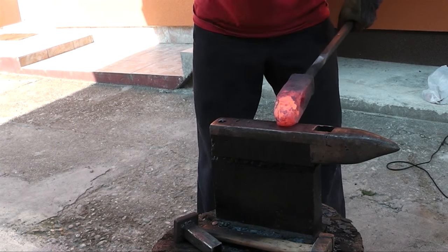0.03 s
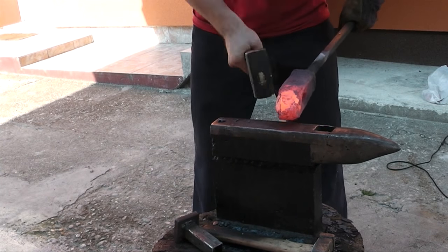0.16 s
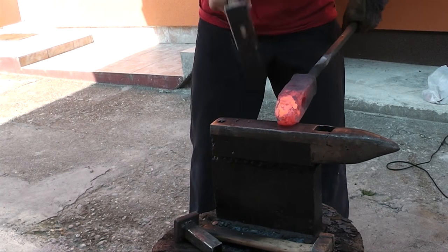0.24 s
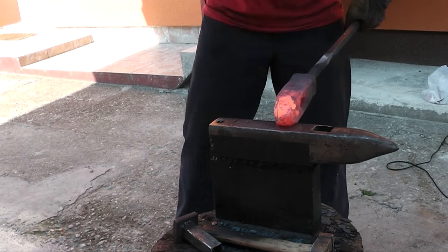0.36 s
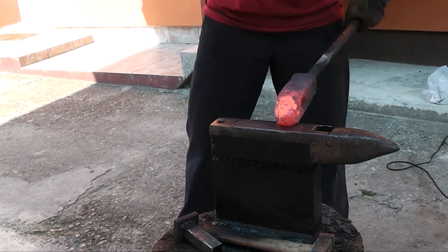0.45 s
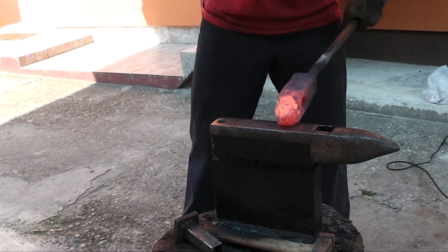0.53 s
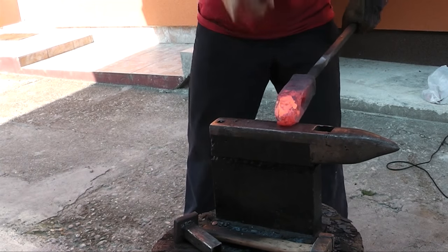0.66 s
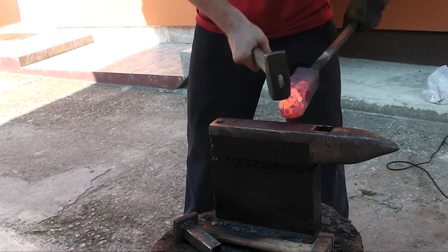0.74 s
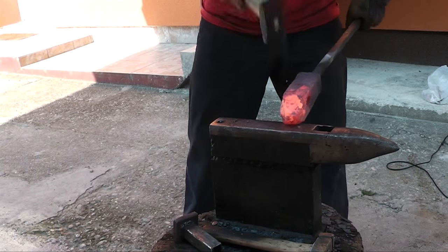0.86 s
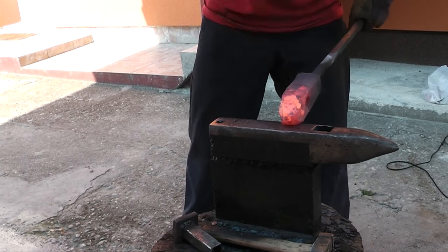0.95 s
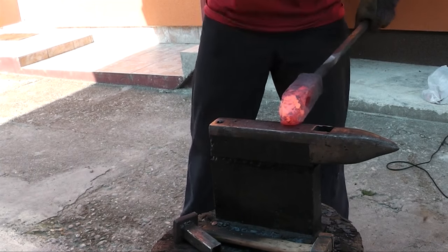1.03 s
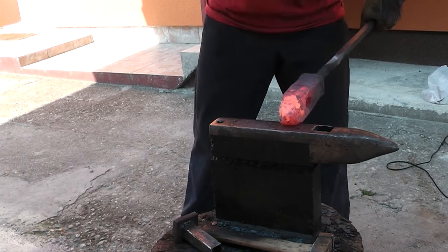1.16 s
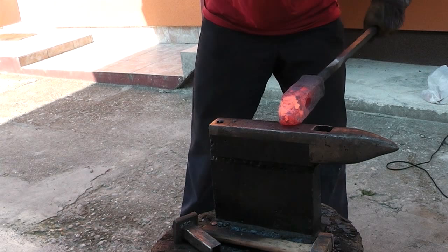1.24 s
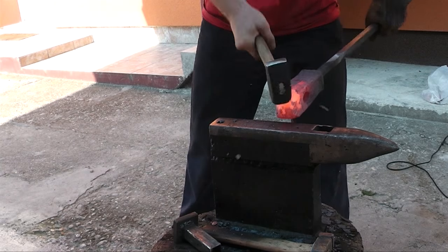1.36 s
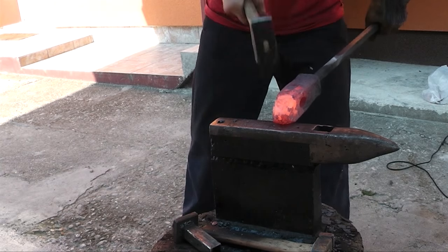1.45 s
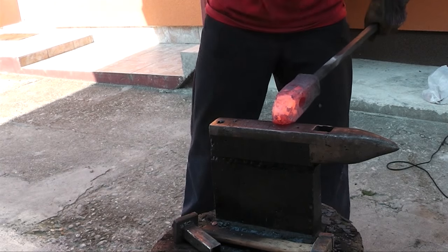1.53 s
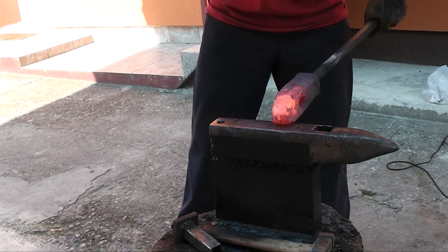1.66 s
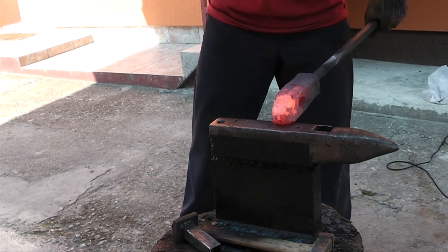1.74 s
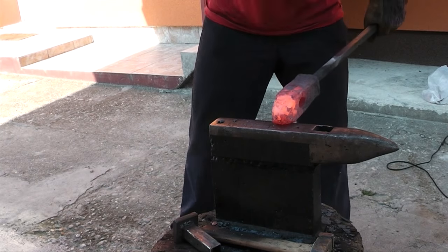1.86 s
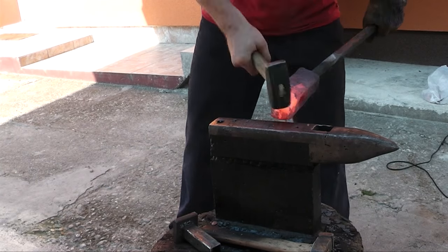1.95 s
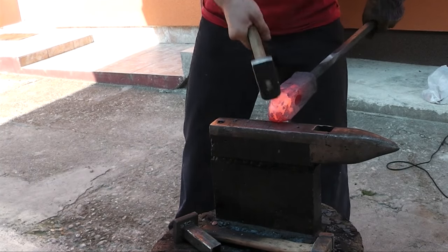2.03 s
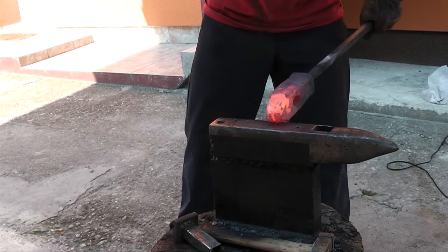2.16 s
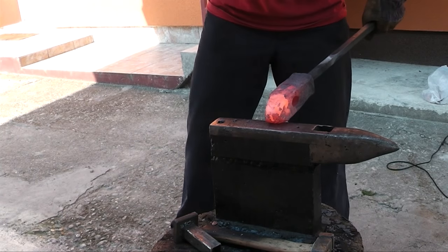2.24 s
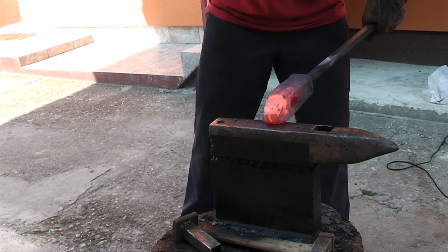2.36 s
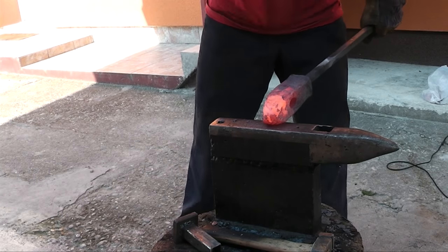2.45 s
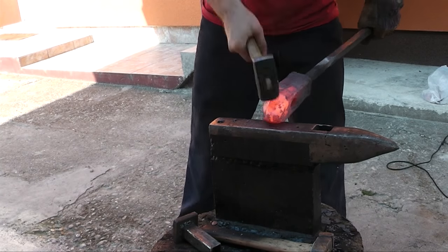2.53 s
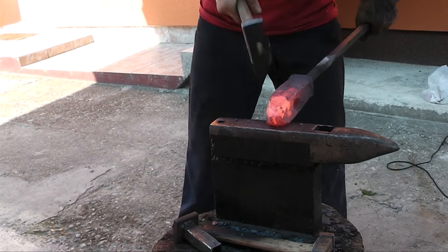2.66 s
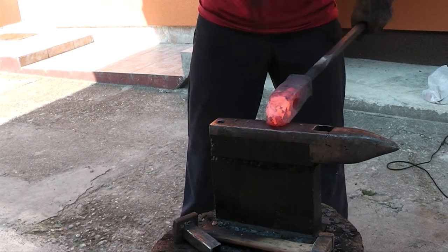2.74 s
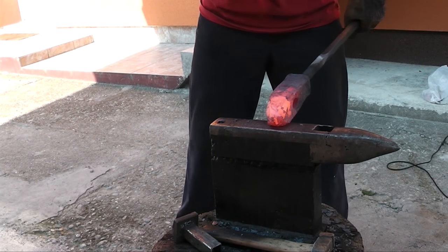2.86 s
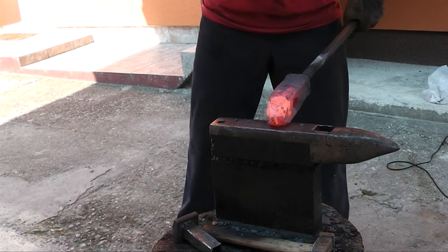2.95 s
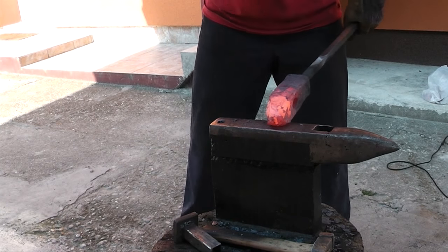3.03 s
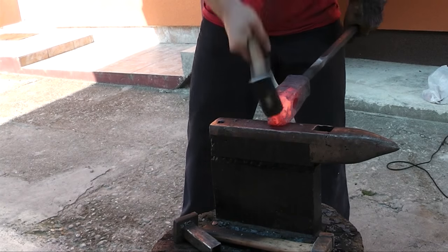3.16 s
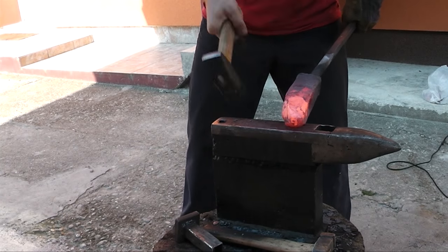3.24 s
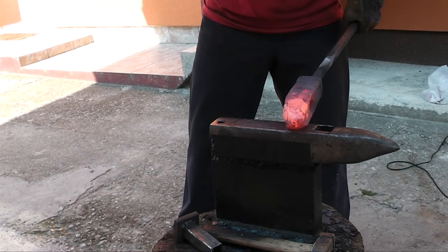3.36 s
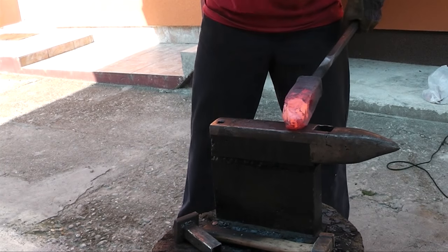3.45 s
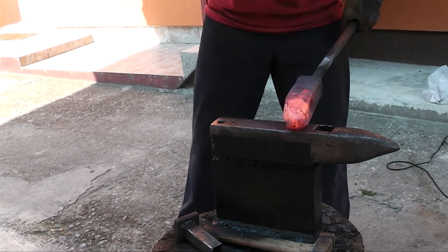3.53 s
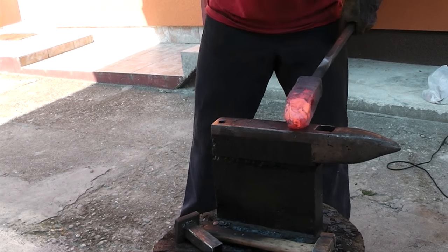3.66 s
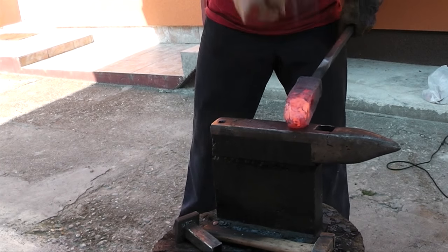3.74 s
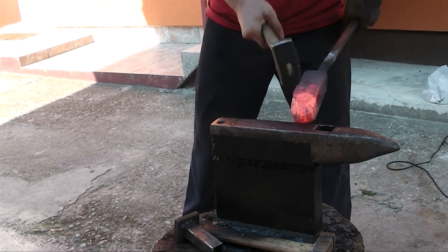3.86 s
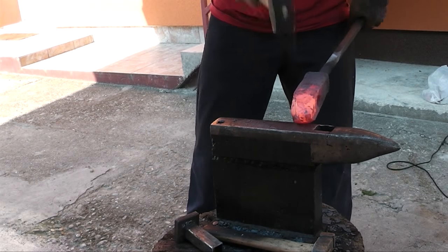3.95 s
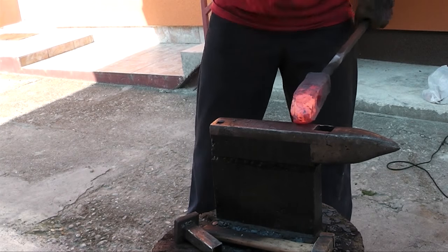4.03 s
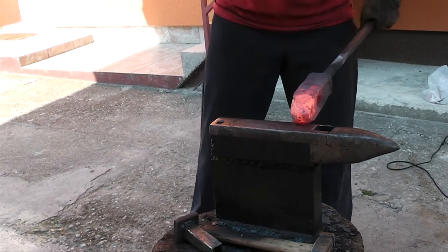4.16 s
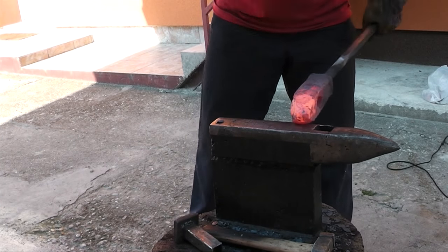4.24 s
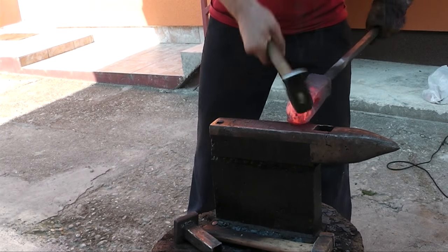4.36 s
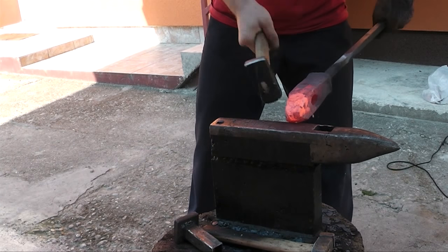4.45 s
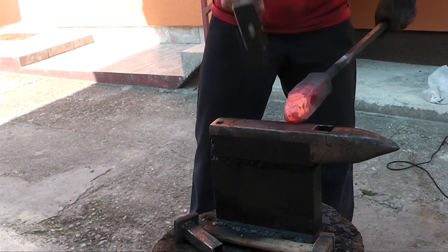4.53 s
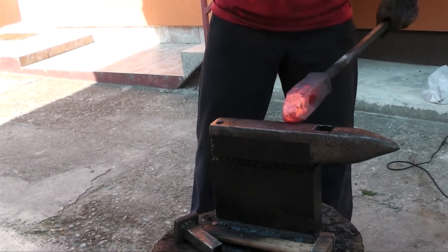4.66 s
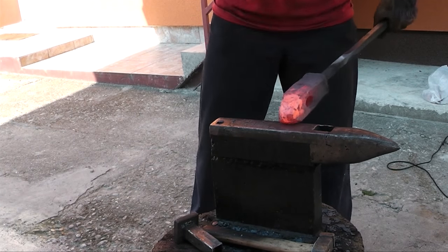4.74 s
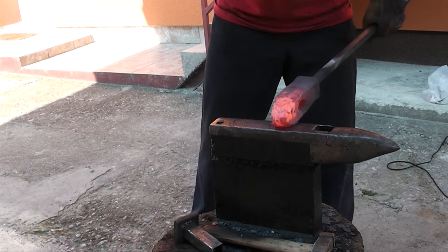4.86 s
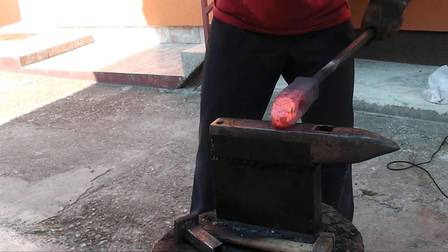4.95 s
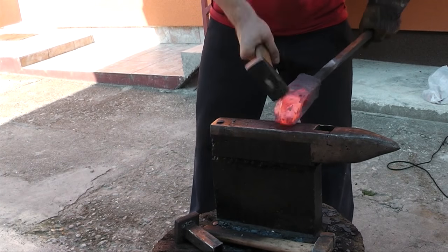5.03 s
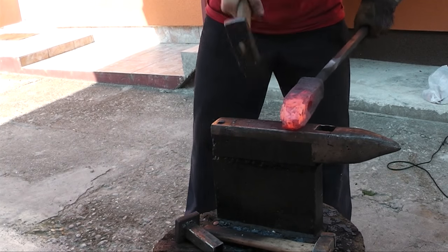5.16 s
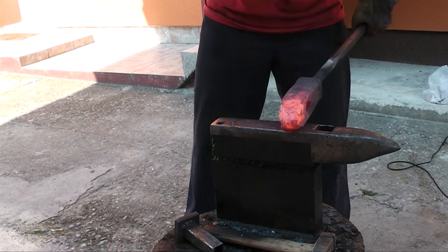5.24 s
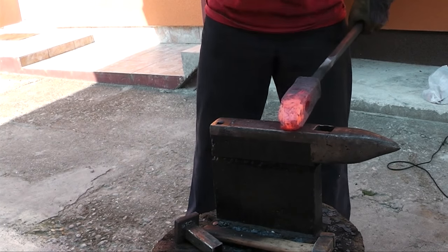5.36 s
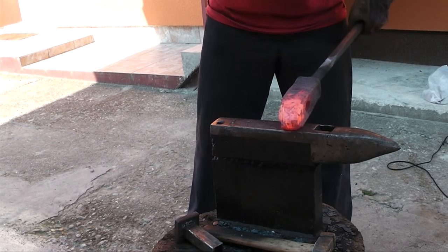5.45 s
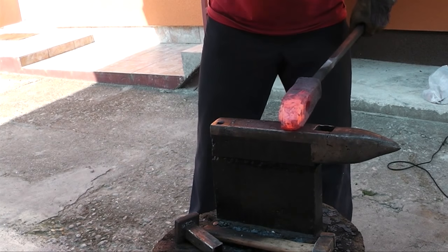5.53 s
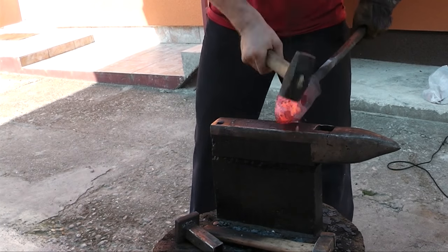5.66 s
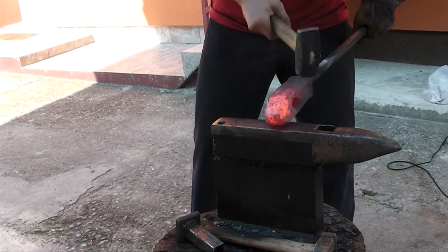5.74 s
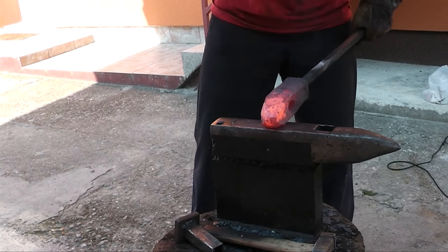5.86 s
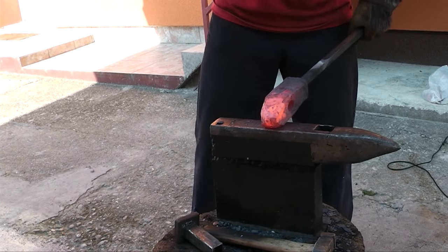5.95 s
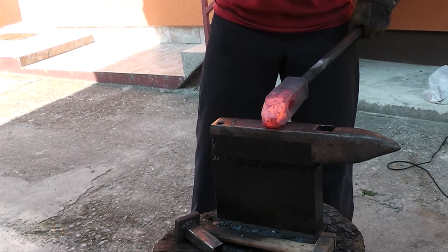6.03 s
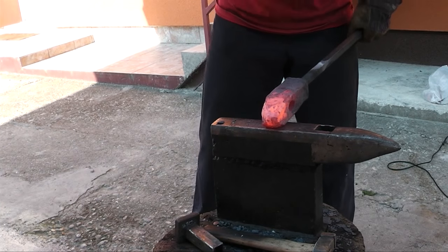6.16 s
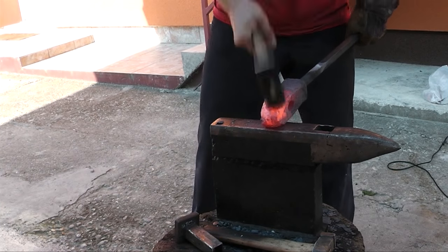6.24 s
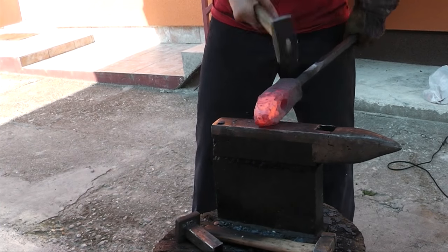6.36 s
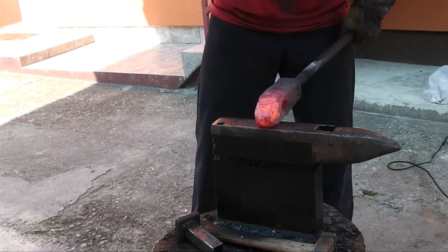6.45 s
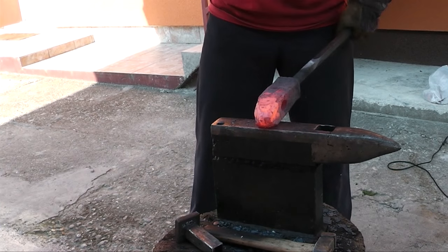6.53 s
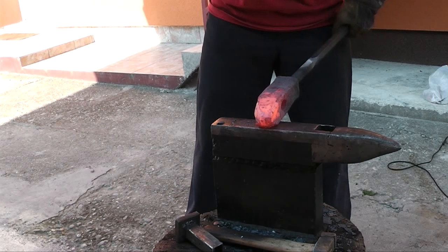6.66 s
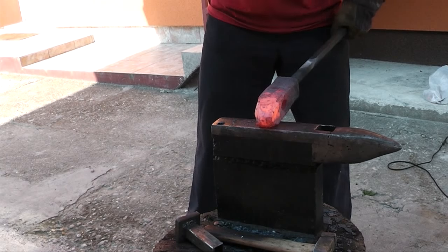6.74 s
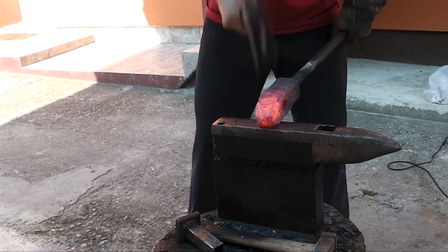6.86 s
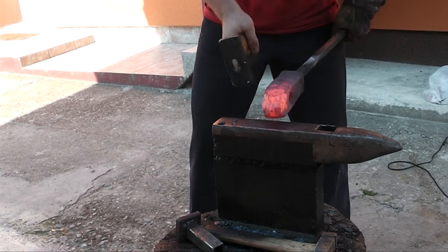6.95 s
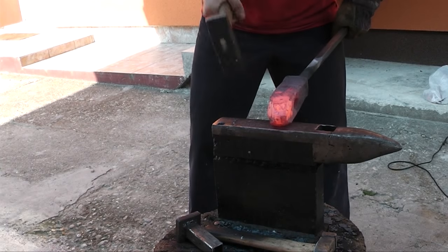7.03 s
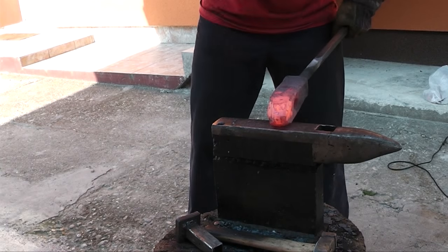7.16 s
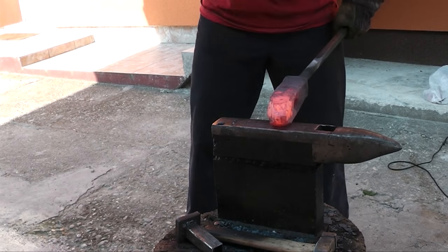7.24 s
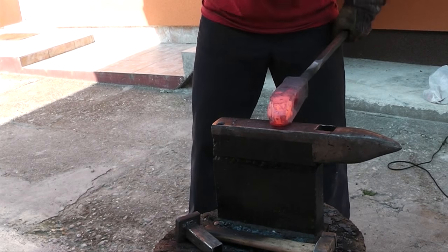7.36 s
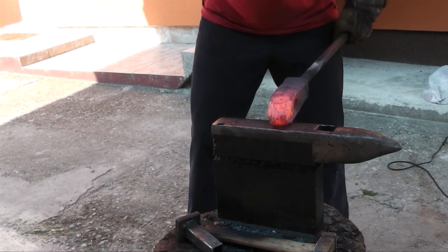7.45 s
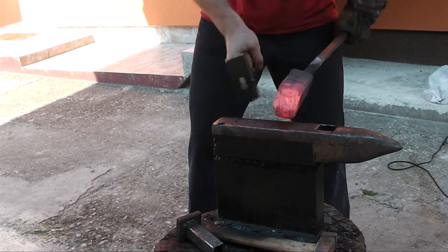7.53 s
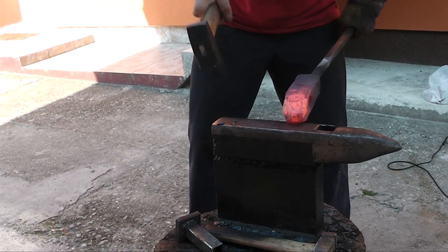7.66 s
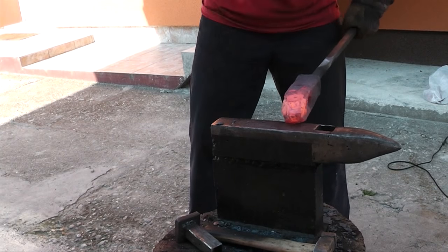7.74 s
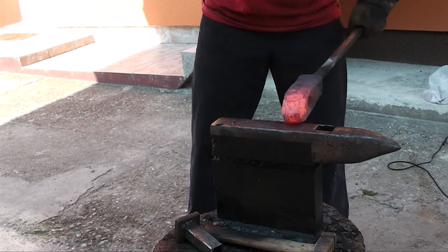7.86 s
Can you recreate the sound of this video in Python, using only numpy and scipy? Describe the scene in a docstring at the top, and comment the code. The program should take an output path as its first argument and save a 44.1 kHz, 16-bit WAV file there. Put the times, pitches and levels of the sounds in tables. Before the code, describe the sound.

Evenly paced hammer blows crack and ring on an anvil outdoors, over the soft rush and whine of a forge blower.

```python
"""Forging at the anvil

A smith draws out a glowing billet with a hand hammer, on an anvil that stands on a stump in a paved yard.
Each blow cracks, thuds through the stump and excites the anvil's modes, which ring until the billet
settles and damps them. A forge blower whines nearby; an automatic gain control ducks it at each blow
and lets it swell again."""
import sys
import numpy as np
from scipy import signal
from scipy.fft import rfft, irfft, next_fast_len
from scipy.io import wavfile
from scipy.ndimage import uniform_filter1d

SR = 44100
rng = np.random.default_rng(int(sys.argv[2]) if len(sys.argv) > 2 else 0)


def digitize_waveform(pressure):
    """Quantize a signal to 16-bit integers and store it at the path in sys.argv[1].

    Rows of a 2-D input are taken as channels; values are limited to [-1, 1].
    """
    field = np.atleast_2d(pressure).T
    bounded = np.clip(field, -1, 1)
    quanta = np.round(bounded * 32767).astype(np.int16)
    wavfile.write(sys.argv[1], SR, quanta)


N = 348390
T = np.arange(int(.6 * SR)) / SR  # seconds since a contact


# Each row: start in seconds, force in dB, place (0 at the node of the first bending mode, 1 at its
# antinode), upper bending mode in dB, crack treble in dB, first hop in seconds, landing level in dB,
# free ringing in seconds.
HAMMER_BLOWS = [ (0.1814, -.5, 0.76, -0.5, 2, 0.086, -14, 0.12),
                (0.7751, 3.5, 0.41, -3.5, 3, 0.12, -19.5, 0.23),
                (1.3841, -4, 0.26, -4, -6, .1065, -14, 0.18),
                (1.9986, -2, 0.36, -6.5, -3.5, 0.083, -20, 0.1),
                (2.609, -0.5, 0.58, -4.5, -2, 0.068, -23, 0.099),
                (3.229, -0.5, 0.97, -1, 0.5, 0.11, -18, 0.13),
                (3.8503, 3.5, 0.17, -5, 2.5, 0.11, -23.5, 0.12),
                (4.4633, -2, 0.09, -3, -2.5, 0.1, -25.5, 0.13),
                (5.0890, 2, 0.45, -4, -.5, 0.039, -25, 0.12),
                (5.7192, 1, 0.38, -3.5, 1.5, 0.082, -23, 0.12),
                (6.3497, -1, 0.7, -3.5, 1.5, 0.085, -14.5, 0.18),
                (6.9597, -0.5, 0.92, -7.5, 8, 0.11, -14.5, 0.092),
                (7.591, 0.5, 0.69, 0, 6.5, .107, -16.5, 0.12)]

def hammering():
    """Impact and inelastic rebound: after each blow the billet hops, each time lower and more briefly."""
    impacts, steel = np.zeros(N), np.zeros(N)
    restitution = 0.37
    for s, force_db, place, upper_db, treble_db, hop_s, landing_db, free_s in HAMMER_BLOWS:
        add(impacts, s, undb(force_db) * strike(place, treble_db))
        add(steel, s, undb(force_db) * anvil_ring(place, upper_db, free_s))
        for hop, after_s in enumerate(np.cumsum(hop_s * restitution ** np.arange(3))):
            knock, clink = landing(thud_db=landing_db - 9 - 7 * hop, clink_db=landing_db + 5.5 - 14 * hop)
            add(impacts, s + after_s, knock)
            add(steel, s + after_s, clink)
    return impacts, steel


# Modes of hammer head and billet. Each row: frequency in Hz, level in dB, t60 in seconds.
TOOL_MODES = [(1452, -17.5, 0.013), (1682, -17, 0.018), (2647, -28, 0.045), (4166, -25, 0.018),
              (4802, -19, 0.029), (5202, -25.5, 0.029), (6330, -24.5, 0.028), (7490, -34, 0.033),
              (8960, -25.5, 0.014), (10900, -56, 0.024)]

def strike(place, treble_db):
    """Compliance: the more the anvil gives, the more air it pushes and the less the tools clang."""
    body = undb(1.5) * thud(rise_s=.0036, detune=.012) + place * undb(-18) * push(width_s=.00074)
    clang_db = 7 - 3 * place + 2 * rng.standard_normal(len(TOOL_MODES))
    clang = ring(TOOL_MODES, clang_db, detune=.01) * onset(rise_s=.0026)  # modes shift with the grip
    burst = crack(db=-14.5, t60=.037, treble_db=treble_db)
    return body + clang + burst + rattle(db=-16.5, t60=.26, count=14)


# The anvil's two main bending modes (first and third rows) among its overtones.
# Each row: frequency in Hz, level in dB, t60 in seconds.
ANVIL_MODES = [(1372, -22, .5), (1701, -31, .24), (2589, -26, .42), (4246, -46, .4), (5141, -43, .4),
               (5319, -44, .4), (5903, -46, .36), (2668, -54, .25), (3279, -57, .3), (9802, -57, .3)]

def anvil_ring(place, upper_db, free_s):
    """Mode shape: away from its node the first mode is driven harder, while three overtones wane."""
    weights_db = 2 * rng.standard_normal(len(ANVIL_MODES))
    weights_db[:3] = 3 + 20 * np.log10(max(place, 1e-3)), 0, upper_db
    weights_db[3:6] += 4.5 - 26.5 * place
    damping = choke(free_s, low_t60=.5, high_t60=.44, other_t60=.42)
    return ring(ANVIL_MODES, weights_db, detune=.0003, damping=damping)


def choke(free_s, low_t60, high_t60, other_t60):
    """Contact damping: after free_s the settled billet adds a further decay to every mode."""
    t60 = np.full(len(ANVIL_MODES), other_t60)
    t60[0], t60[2] = low_t60, high_t60
    return fade(np.maximum(T - free_s, 0), t60[:, None])


def landing(thud_db, clink_db):
    """Secondary impact: the falling billet rocks the anvil but hardly drives its main bending modes."""
    knock = undb(thud_db) * thud(rise_s=.0022, detune=.014, rocking_db=19.5)
    tick = undb(clink_db) * crack(db=-25.5, t60=.054, treble_db=-4.5) * onset(rise_s=.003)
    touch_db = -4 + 2 * rng.standard_normal(len(ANVIL_MODES))
    touch_db[:3] = -18, 3, -18
    clink = undb(clink_db) * ring(ANVIL_MODES, touch_db, detune=.00088) * fade(T, t60=.72)
    return knock + tick, clink


# Modes of the anvil's bulk on the stump, rocking first.
# Each row: frequency in Hz, level in dB, t60 in seconds.
STUMP_MODES = [(563.7, -27.5, 0.1), (208, -17.5, 0.019), (289.3, -13, 0.024), (452.6, -3, 0.025),
               (498.2, -4.5, 0.029), (794, -10, 0.023), (1114, -22, 0.03)]

def thud(rise_s, detune, rocking_db=0):
    """Mass on a damped spring: the anvil sinks into the stump; light contacts mostly rock it."""
    weights_db = np.zeros(len(STUMP_MODES))
    weights_db[0] = rocking_db
    return -ring(STUMP_MODES, weights_db, detune) * onset(rise_s)


# Contact noise. Each row: frequency in Hz, relative spectral density in dB.
CRACK_SPECTRUM = [(30, -45), (200, 3), (500, -1.5), (1500, -1.5), (2200, -7.5), (3300, -47.5), (4500, -12),
                  (7000, -15.5), (10500, -17.5), (12000, -28)]

def crack(db, t60, treble_db):
    """Broadband transient: steel meets scaly steel, and a harder contact adds treble."""
    burst = colour(noise(CRACK_SPECTRUM, len(T)), [(2500, 0), (8000, treble_db)])
    return undb(db) * burst * fade(T, t60)


def push(width_s):
    """Acceleration noise: one swing of air pressure as the hammer head stops."""
    return -T / width_s * np.exp(1 - T / width_s)


def rattle(db, t60, count):
    """Contact chatter: the anvil shuffles on the stump in small, fading taps."""
    taps = np.zeros(len(T))
    times_s = np.linspace(.035, .22, count) + rng.uniform(-.00808, .00826, count)
    for s, size in zip(times_s, rng.standard_normal(count)):
        add(taps, s, np.array([size]))
    tap = thud(rise_s=.0016, detune=.055, rocking_db=6) + undb(-14) * push(width_s=.00063)
    return undb(db) * signal.fftconvolve(taps * fade(T, t60), tap)[:len(T)]


# The yard's echoes. Each row: frequency in Hz, relative spectral density in dB.
ECHO_SPECTRUM = [(40, -15), (110, 7), (250, -10), (600, -2), (1200, 3), (2200, -3), (3300, 6.5), (5500, -2),
                 (8500, -1.5), (12000, 0)]

def yard(x, t60, treble_t60):
    """Reverberation: paving and house walls scatter the sound into a tail with two decay rates."""
    tail = noise(ECHO_SPECTRUM, len(T))
    low = colour(tail, [(5000, -10), (7500, -6.5), (9500, -37)])
    response = (low * fade(T, t60) + (tail - low) * fade(T, treble_t60)) * onset(rise_s=.0073)
    return signal.fftconvolve(x, response / np.linalg.norm(response))[:N]


# Rushing air. Each row: frequency in Hz, relative spectral density in dB.
AIR_SPECTRUM = [(30, -12), (130, -17.5), (290, -4), (600, -2.5), (950, -0.5), (1250, -6), (1550, -4),
                (2100, -14.5), (2500, -23), (3300, -28.5), (4600, -20.5), (6200, -22), (7800, -25.5),
                (9200, -23), (11100, -22.5), (12000, -37)]
# Blade tones. Each row: frequency in Hz, rms level in dB.
BLADE_TONES = [(808, -88), (960, -76.5), (1026, -67), (2003, -87), (2051, -83.5), (2730, -99)]

def blower():
    """Fan noise: air rushes through the forge blower, whose blade tones waver with its speed."""
    air = noise(AIR_SPECTRUM, N) * undb(-64 + 1.4 * walk(8.7))
    speed = 1 + .0014 * walk(3) + .0028 * walk(60)
    rotor_s = np.cumsum(speed) / SR
    tones = sum(np.sqrt(2) * undb(db + 2.2 * walk(25)) * np.sin(2 * np.pi * hz * rotor_s)
                for hz, db in BLADE_TONES)
    return air + tones


# The microphone pair. Each row: frequency in Hz, left minus right in dB, lag of the left in radians.
PAIR_RESPONSE = [(60, 1, .03), (170, .9, 0), (380, 2.8, .06), (700, 2.6, .05), (1400, 2, .11),
                 (2000, .4, .04), (2600, .6, .06), (5000, -.3, .02), (10000, -.8, 0)]

def microphone(x, sign):
    """Level and phase cues: the left (sign 1) and right (sign -1) microphones each take half."""
    hz, db, lag = np.transpose(PAIR_RESPONSE)
    size = next_fast_len(len(x))
    log_f = np.log(np.maximum(np.fft.rfftfreq(size, 1 / SR), 1))
    response = np.interp(log_f, np.log(hz), undb(sign * db / 2) * np.exp(-1j * sign * lag / 2))
    return irfft(rfft(x, size) * response, size)[:len(x)]


def gain_control(x, target_db, release_db_per_s, start_db):
    """Compression: the gain drops at once on a loud sound and climbs back at a steady rate."""
    power = uniform_filter1d(np.mean(x ** 2, axis=0), size=200)
    level_db = 10 * np.log10(np.maximum(power, 1e-12))
    level_db[0] = start_db  # the gain starts held down
    recovery_db = release_db_per_s * np.arange(N) / SR
    held_db = np.maximum.accumulate(level_db + recovery_db) - recovery_db
    return x * uniform_filter1d(undb(target_db - held_db), size=30)


def ring(modes, weights_db=0, detune=0., damping=1):
    """Modal superposition: a sum of weighted, slightly detuned, decaying sinusoids."""
    hz, db, t60 = np.transpose(modes)
    hz = hz * (1 + detune * rng.standard_normal(len(hz)))
    partials = np.sin(2 * np.pi * hz[:, None] * T) * fade(T, t60[:, None]) * damping
    return undb(db + weights_db) @ partials


def onset(rise_s):
    """Finite rise time: a smooth start."""
    return 1 - np.exp(-(T / rise_s) ** 2)


def fade(t, t60):
    """Exponential decay by 60 dB in t60 seconds."""
    return np.exp(-np.log(1000) * t / t60)


def colour(x, points):
    """Spectral shaping by a curve of (Hz, dB) points."""
    hz, db = np.transpose(points)
    size = next_fast_len(len(x))
    f = np.maximum(np.fft.rfftfreq(size, 1 / SR), 1)
    gain = undb(np.interp(np.log(f), np.log(hz), db))
    return irfft(rfft(x, size) * gain, size)[:len(x)]


def noise(points, size):
    """Coloured noise of rms 1."""
    x = colour(rng.standard_normal(size), points)
    return x / np.sqrt(np.mean(x ** 2))


def walk(rate):
    """Random modulation of spread near 1, with rate new values a second."""
    knots = rng.standard_normal(2000)
    return np.interp(np.arange(N) / SR * rate, np.arange(len(knots)), knots)


def delay(x, s):
    """Propagation delay of s seconds."""
    return np.interp(np.arange(N) - s * SR, np.arange(N), x, left=0)


def add(track, s, sound):
    """Superposition of a sound on the track at s seconds."""
    start = int(s * SR)
    part = track[start:start + len(sound)]
    part += sound[:len(part)]


def undb(db):
    """Decibels to amplitude ratio."""
    return 10 ** (np.asarray(db) / 20)


def scene():
    """Direct and diffuse fields: two close microphones hear nearly the same, but for echoes and air."""
    impacts, steel = hammering()
    wall = undb(-15) * delay(impacts, s=.018)
    echoes = undb(-10) * yard(impacts, t60=.45, treble_t60=.23)
    mid = impacts + steel + wall + echoes + blower()
    diffuse_rush = undb(-81) * noise([(30, 7), (150, 8.5), (450, 12), (1000, 0), (1700, 17), (3000, -40),
                                      (6000, -108), (11000, 2), (12000, 5)], N)
    impact_scatter = undb(-28.5) * yard(impacts, t60=.44, treble_t60=.24)
    steel_scatter = undb(-18) * yard(steel, t60=.08, treble_t60=.084)
    side = impact_scatter + steel_scatter + diffuse_rush
    return np.array([microphone(mid + sign * side, sign) for sign in (1, -1)])


def record(dry):
    """Dynamic range and bandwidth limits: gain control, soft saturation and a steep low-pass."""
    levelled = gain_control(dry, target_db=-10, release_db_per_s=45, start_db=-33.5)
    ceiling, top_hz = undb(-4), 12000
    rounded = ceiling * np.tanh(levelled / ceiling)
    return signal.sosfilt(signal.ellip(8, .2, 70, top_hz, fs=SR, output="sos"), rounded)


dry = scene()
out = record(dry)
digitize_waveform(out)
```